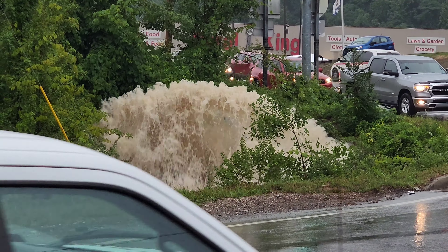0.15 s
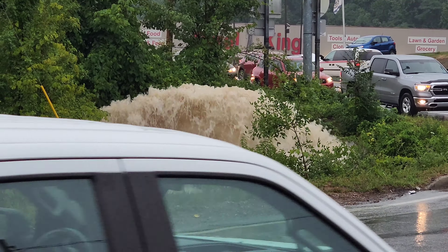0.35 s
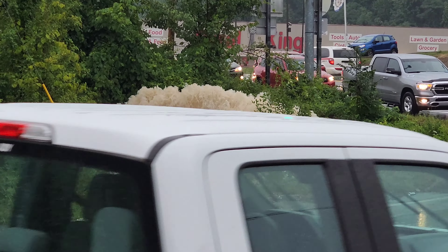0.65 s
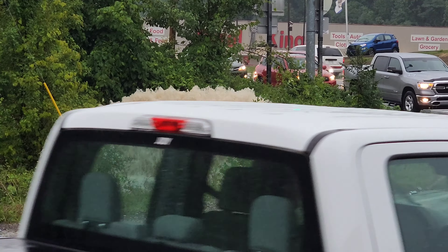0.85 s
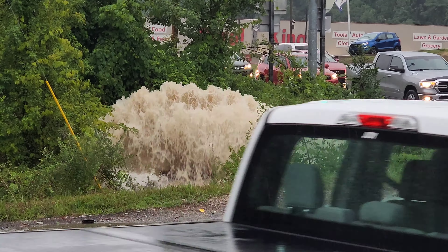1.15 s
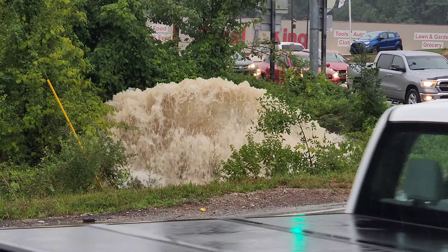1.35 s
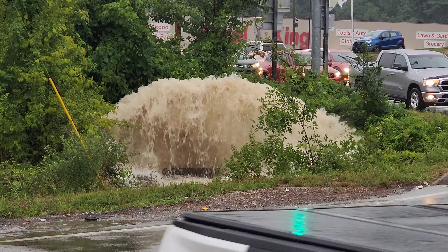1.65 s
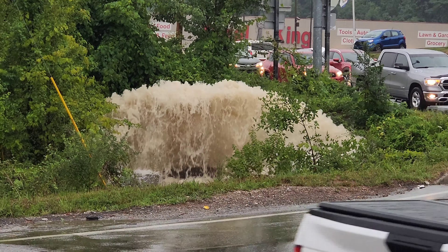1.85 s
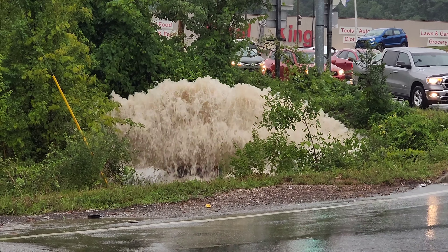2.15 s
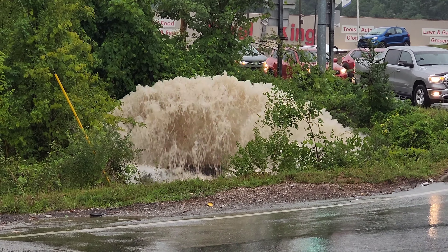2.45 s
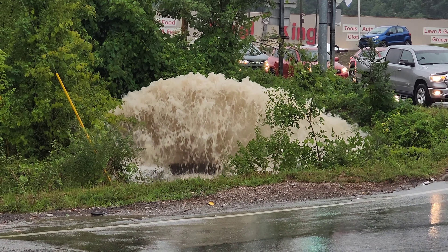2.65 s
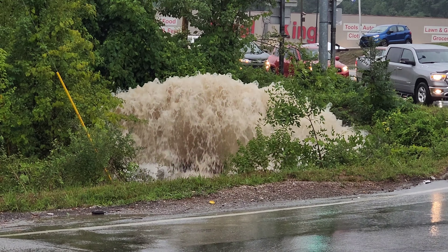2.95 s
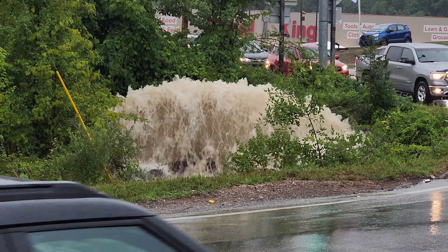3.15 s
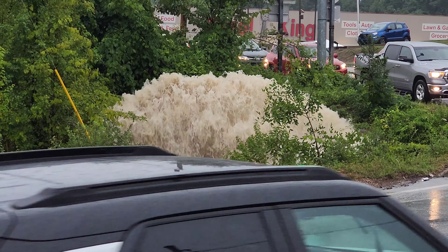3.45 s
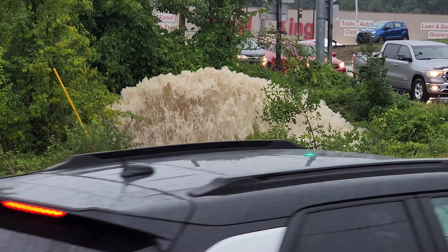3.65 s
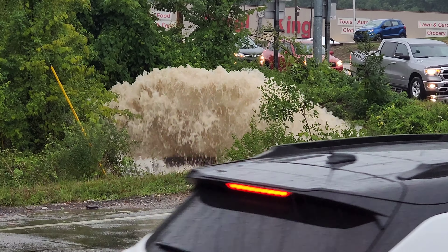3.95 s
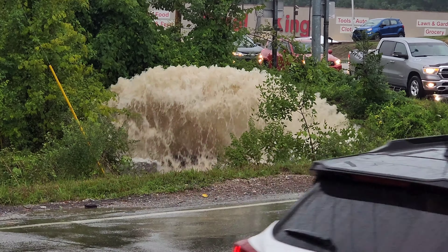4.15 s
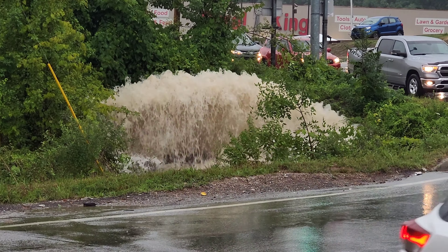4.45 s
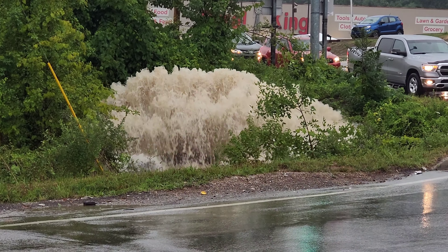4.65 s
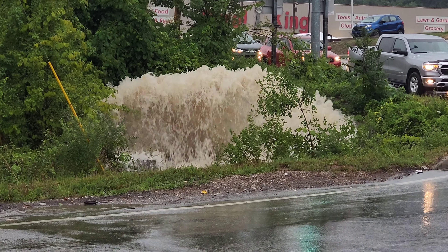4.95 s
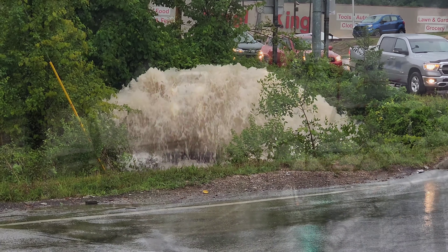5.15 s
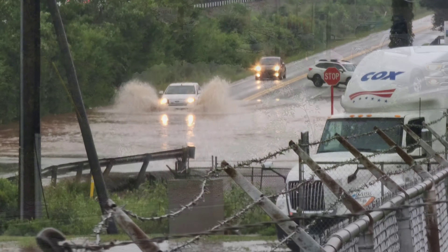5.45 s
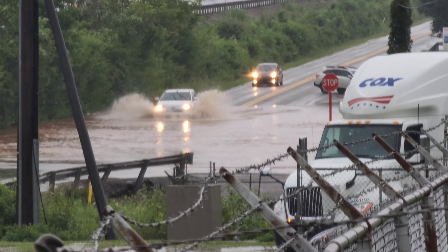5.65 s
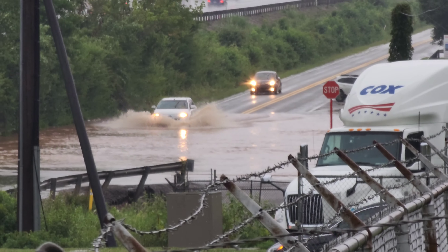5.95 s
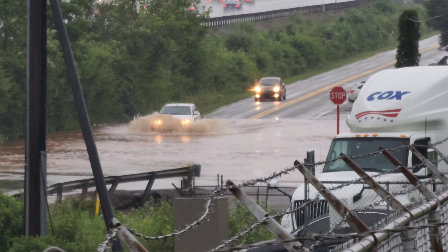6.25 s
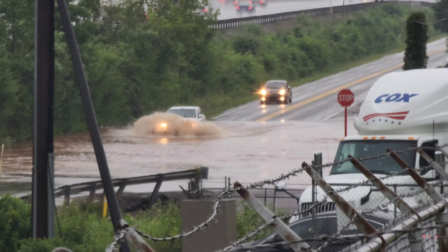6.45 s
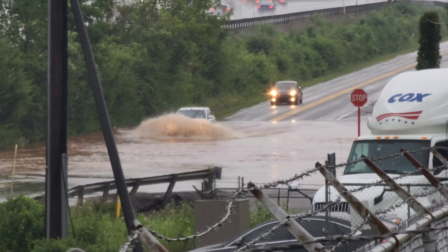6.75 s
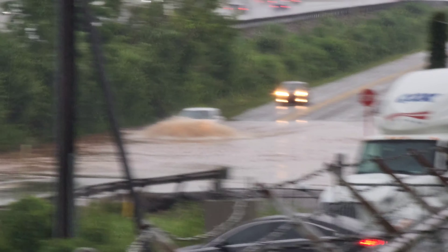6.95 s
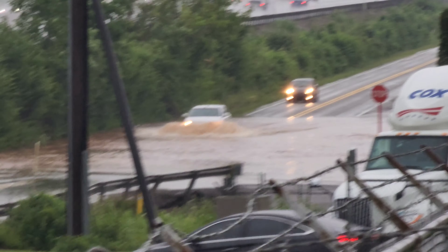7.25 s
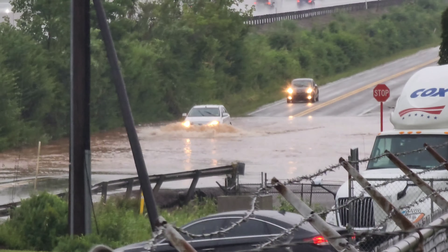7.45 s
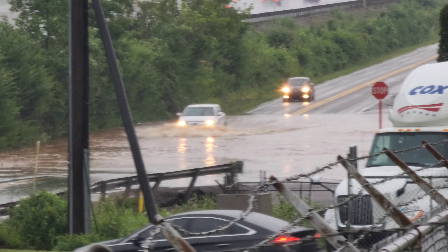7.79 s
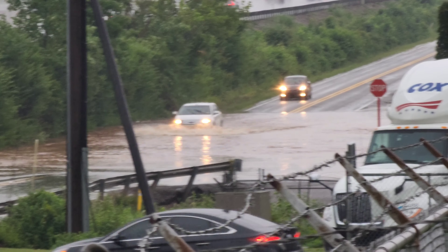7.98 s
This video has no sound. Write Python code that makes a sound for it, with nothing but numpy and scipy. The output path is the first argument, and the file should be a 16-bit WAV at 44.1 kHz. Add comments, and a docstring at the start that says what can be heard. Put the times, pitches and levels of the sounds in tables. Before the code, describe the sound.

From 0 to about 5 seconds, floodwater gushes continuously from a roadside drain: a dense, turbulent rush with bubbles, fine spray and gentle surges. Low traffic rumble lies beneath. A pickup passes close around 0.4 to 1.4 s, with wet tyre hiss, deep engine growl and a quick loose metallic rattle just after 1 s; a soft wheel clunk comes at 1.7. Another car drones and swishes by around 3.4 to 4.6 s, and tiny drops tick nearby. Brief low wind buffets appear. A small clank at 5.0 s falls within the crossfade, 4.8 to 5.8 s, into a flooded road. Here a wading car throws broad splashing spray that slowly weakens, while a lorry engine revs up until 7 s, then eases down. At 7.05 to 7.15 s a rapid clatter of hollow, dull knocks shakes close to the microphone; scattered knocks and deep thumps continue until 7.9 s over the wash.

```python
"""Drain fountain and flooded road

Floodwater gushes from a roadside drain while vehicles pass on the wet road, one of them clanking.
From about five seconds this blends into a flooded road, with a wading car, a lorry and dull knocks.
Water is patchy filtered noise with ringing bubbles; engines and vehicle hums are wavering tones;
metal and panel are struck resonances. Wind and late panel booms are short low swings, and traffic
is low filtered noise."""
import sys
import numpy as np
from scipy import signal
from scipy.fft import rfft, irfft, next_fast_len
from scipy.io import wavfile
from scipy.ndimage import uniform_filter1d, map_coordinates

SR = 44100
rng = np.random.default_rng(int(sys.argv[2]) if len(sys.argv) > 2 else 0)


def transcribe(u):
    """Save the signal u as a 16-bit wav file named by the first command-line argument.

    u: samples, shape (n,) or (channels, n), limited to [-1, 1]; the rate is SR.
    q: integer samples, one column per channel.
    """
    v = np.clip(np.atleast_2d(u).T, -1, 1)
    q = np.round(v * 32767).astype(np.int16)
    wavfile.write(sys.argv[1], SR, q)


N = 358091  # samples

SPRAY_DB, SPLASH_DB = -34.5, -29  # the fountain at rest
SPLASH_FOLLOWS = 0.3  # share of the surges that the heavy water follows
# spectrum of the fountain: pitch_hz, relative density_db (per Hz), left_minus_right_db, likeness (0-1)
DRAIN_SPECTRUM = [(396,-4,-0.5,0), (640,-1.5,-0.5,0.82), (860,-2,-3,0), (1380,0,-2,0.35),
                  (2170,-3.5,5,0.26), (2540,-8,3,0.3), (3030,-8,7.5,0.13), (4740,-24,16.5,0),
                  (5500,-16.5,15,0.03), (7020,-18,2.5,0.38), (7860,-16,-2.5,1), (9250,-25,5,0.5),
                  (10900,-21,-4,0.95), (11650,-15.5,-7,0.97), (13200,-22.5,5.5,0.27), (15500,-26,12,0.22)]
# surges of the fountain: centre_s, half_duration_s, extra_spray_db
DRAIN_SURGES = [(.25, 0.33, 1), (1.6, 0.29, 1.6), (2.84, 0.27, 1.5), (3.33, .18, 1), (4.15, 0.24, 1.4)]


def drain():
    """Turbulent jet: slow surges lift the spray most, and its level varies slightly at random."""
    surge_db = sum(db * swell(s, half) for s, half, db in DRAIN_SURGES)
    heave_db = 0.091 * wobble(14)
    splash_db = SPLASH_DB + SPLASH_FOLLOWS * surge_db + heave_db
    spray_db = SPRAY_DB + surge_db + heave_db + 0.4 * wobble(25)
    source = churn(grain_db=-7.0, patchy_db=2.5, drop_hz=7330)
    return water(source, DRAIN_SPECTRUM, -0.18, 3340, splash_db, spray_db)


BLEND_START_S, BLEND_END_S, BLEND_POWER = 4.84, 5.83, 0.94  # the power bends the fade
WASH_DB, BOW_SPRAY_DB = -28.5, -25  # heavy water; spray before slowing, turning and bursts
SLOWING_DB_PER_S = 0.67  # the wading car throws less spray as it slows
TURN_S, TURN_LENGTH_S, TURN_LOSS_DB = 7.1, 0.027, 1  # the microphone swings away from the spray
# spectrum of the flooded road: pitch_hz, relative density_db (per Hz), left_minus_right_db, likeness (0-1)
ROAD_SPECTRUM = [(530,-2.5,-1,0.67), (673,5.5,3,0.48), (780,4.5,-3,0.57), (1050,-1,-1,0.22),
                 (1300,3.5,0,0.49), (2750,-8,-1.5,0.39), (3850,-4,-13.5,0.11), (5170,-14.5,-4.5,0.37),
                 (5850,-19,8,0.16), (7030,-20,13,0.27), (7270,-17,-2,0.97), (8640,-18,0.5,0.77),
                 (10200,-25.5,-2.7,0.9), (11700,-20.5,-6,0.92), (14500,-27.5,2,0.74)]
# the bow wave breaks higher and lower: centre_s, half_duration_s, extra_spray_db
BOW_BURSTS = [(5.812, 0.11, 1), (6.503, 0.051, -1), (7.046, 0.038, 1.1), (7.142, 0.045, -1.5)]


def flooded_road():
    """Breaking bow wave: broadband spray over heavy wash, both surging, the spray waning with speed."""
    t = clock()
    turned = (1 + np.tanh((t - TURN_S) / TURN_LENGTH_S)) / 2
    slowing_db = SLOWING_DB_PER_S * np.maximum(t - BLEND_END_S, 0)
    burst_db = sum(db * swell(s, half) for s, half, db in BOW_BURSTS)
    spray_db = BOW_SPRAY_DB - slowing_db - TURN_LOSS_DB * turned + burst_db
    surge_db = 0.44 * wobble(18)
    source = churn(grain_db=-8.0, patchy_db=1.5, drop_hz=6940)
    return water(source, ROAD_SPECTRUM, 0.35, 2080, WASH_DB + surge_db, spray_db + surge_db)


def places():
    """Crossfade: gains of the drain and of the flooded road as one gives way to the other."""
    blend = np.interp(clock(), [BLEND_START_S, BLEND_END_S], [0, 1])
    return (1 - blend) ** BLEND_POWER, blend ** BLEND_POWER


def water(source, table, lead_ms, split_hz, splash_db, spray_db):
    """Spectral shaping: heavy splash below split_hz and fine spray above it, each at its own level."""
    pair = ears(source, lambda hz: along(table, hz, axis=3), lead_ms)

    def colour(hz):
        ratio = amp(along(table, hz, axis=2))
        balance = np.array([ratio, np.ones_like(ratio)]) / np.hypot(ratio, 1)
        return amp(along(table, hz)) * above(hz, 230) * balance

    splash = unit(filtered(pair, lambda hz: colour(hz) * below(hz, split_hz)))
    spray = unit(filtered(pair, lambda hz: 1j * colour(hz) * above(hz, split_hz)))
    return amp(splash_db) * splash + amp(spray_db) * spray


def churn(grain_db, patchy_db, drop_hz):
    """Turbulence: two unrelated channels of patchy hiss studded with bubbles and droplets."""
    z = signal.stft(rng.standard_normal((2, N)), nperseg=512)[2]
    field = rng.standard_normal(z.shape[1:])
    field = uniform_filter1d(field, size=13, axis=0)  # smooth across frequency
    field = uniform_filter1d(field, size=12, axis=1)  # smooth across time
    fineness = np.linspace(0.3, 1, len(field))[:, None]  # treble is patchier than bass
    hiss = signal.istft(z * amp(patchy_db * fineness * unit(field)), nperseg=512)[1][:, :N]
    grains = np.array([bubbles(drop_hz, cycles=6.2, spread_db=0.5, count=9000) for ear in hiss])
    return unit(hiss) + amp(grain_db) * grains


def bubbles(pitch_hz, cycles, spread_db, count, size=200):
    """Bubble resonance: many short damped rings rise in pitch; the long low ones start softer."""
    t = np.arange(size) / SR
    start = rng.integers(0, N, (count, 1))
    hz = np.clip(pitch_hz * np.exp(0.55 * rng.standard_normal((count, 1))), 800, 14500)
    strength = hz * amp(spread_db * np.minimum(rng.exponential(size=(count, 1)), 4))
    age = hz * t / cycles  # time in units of the decay
    rise = 1 + np.minimum(age, 2) / 20
    ring = strength * np.exp(-age) * np.sin(2 * np.pi * hz * t * rise)
    sample_index = (start + np.arange(size)).ravel()
    return unit(np.bincount(sample_index, ring.ravel(), N + size)[:N])


FAVOUR_DB, FAVOUR_WIDTH_HZ = 10, 60  # each knock lifts the modes near one pitch
THUD_HZ, THUD_Q = 142, 4  # low boom of a blow; its pitch over its width
SCUFF_DB = -19  # the brighter scuff of each knock, against its ring
SHUDDER_RAGGED_DB = 1  # random flare and falter of the shudder
# knocks of a hollow panel: start_s, ring_level_db, brightness_hz, favoured_pitch_hz, thud_level_db
PANEL_KNOCKS = [(7.045, -14, 595, 400, -7.5), (7.053, -10, 1100, 330, -7.5), (7.059, -9.5, 600, 340, -22),
                (7.067, -16, 750, 540, -28), (7.087, -15, 700, 400, -15), (7.096, -10, 600, 460, -26),
                (7.111, -8.5, 1050, 786, -4), (7.117, -4.5, 550, 364, -16), (7.127, -9, 700, 380, -22),
                (7.135, -7.5, 900, 370, -7), (7.144, -20, 850, 480, -28), (7.258, -14, 1000, 420, -20),
                (7.274, -13, 950, 760, -25), (7.4, -15, 950, 610, -29), (7.546, -12, 900, 340, -20),
                (7.579, -17, 900, 690, -28), (7.591, -12, 600, 480, -24), (7.633, -9, 650, 320, -22),
                (7.648, -8, 650, 520, -22), (7.663, -13, 700, 540, -14), (7.699, -14, 950, 400, -11),
                (7.766, -20, 500, 250, -13), (7.786, -10.5, 900, 280, -12)]
# modes of the panel: pitch_hz, width_hz, level_db
PANEL_MODES = [(147, 28, -7), (277, 31, -6.5), (339.4, 20, 0), (391, 40, 0), (462, 122, -1), (643, 150, -3),
               (813, 170, -4.5)]


def knocks():
    """Modal excitation: blows ring a hollow panel with thud and scuff, and noise makes it shudder."""
    def panel(hz, bright_hz):
        return body(PANEL_MODES, hz) * below(hz, bright_hz, order=3)

    def struck(hz, bright_hz, pitch_hz):
        favour_db = FAVOUR_DB / (1 + ((hz - pitch_hz) / FAVOUR_WIDTH_HZ) ** 2)
        return panel(hz, bright_hz) * amp(favour_db)

    def boom(hz):
        return body([(THUD_HZ, THUD_HZ / THUD_Q, 0)], hz) * below(hz, 340)

    def bright(hz):
        return above(hz, 940) * below(hz, 2000)

    ring_rows = [row[:-1] for row in PANEL_KNOCKS]
    thud_rows = [(s, db) for s, *_, db in PANEL_KNOCKS]
    scuff_rows = [(s, db + SCUFF_DB) for s, db, *_ in PANEL_KNOCKS]
    ring = strikes(ring_rows, t60=0.035, hardness=0.68, response=struck, alike=0.92, lead_ms=0.37)
    thud = strikes(thud_rows, t60=0.025, hardness=0.89, response=boom, alike=0.94, lead_ms=0.25)
    scuff = strikes(scuff_rows, t60=0.13, hardness=0.05, response=bright, alike=0.4, lead_ms=0.31)
    noise = ears(rng.standard_normal((2, N)), lambda hz: 0.7, lead_ms=0.23)
    shudder = unit(filtered(noise, lambda hz: panel(hz, bright_hz=950)))
    ragged = amp(SHUDDER_RAGGED_DB * wobble(70))
    return ring + thud + scuff + shaking() * ragged * shudder


SHUDDER_SWELL_DB_PER_S = 1000
# bouts of shuddering of the panel: start_s, end_s, level_db, fade_db_per_s
SHUDDER_BOUTS = [(7.067, 7.155, -27.5, 110), (7.205, 7.713, -29, 120), (7.502, 7.663, -27.5, 110.5),
                 (7.765, 7.82, -30, 16)]


def shaking():
    """Power summation: the overlapping bouts give the gain of the panel's shudder."""
    bouts = [held(start, end, db, SHUDDER_SWELL_DB_PER_S, fade) for start, end, db, fade in SHUDDER_BOUTS]
    return np.sqrt(sum(bout ** 2 for bout in bouts))


# loose metal on passing cars: start_s, level_db, brightness_hz
METAL_CLANKS = [(1.02, -22, 2000), (1.031, -17, 2100), (1.041, -21, 2100), (1.050, -18.5, 2000),
                (1.062, -23, 1900), (1.122, -21, 1700), (1.25, -27, 1600), (1.34, -26, 1800),
                (5.012, -23, 1800), (5.018, -23, 2300)]
# modes of the metal: pitch_hz, width_hz, level_db
METAL_MODES = [(910, 100, -8.5), (990, 57, -3.5), (1240, 440, -6), (1530, 100, 1), (1730, 230, -2.5),
               (2100, 43, 1.5)]
# wheels over a bump: start_s, level_db
WHEEL_CLUNKS = [(1.715, -23), (5.018, -24)]


def clanks():
    """Modal excitation: blows ring loose metal on passing cars; band-passed blows clunk their wheels."""
    def metal(hz, bright_hz):
        return body(METAL_MODES, hz) * below(hz, bright_hz, order=8)

    def wheel(hz):
        return above(hz, 270) * below(hz, 800)

    rattle = strikes(METAL_CLANKS, t60=0.1, hardness=0.2, response=metal, alike=0.76, lead_ms=-0.14)
    clunk = strikes(WHEEL_CLUNKS, t60=0.059, hardness=0.28, response=wheel, alike=0.7, lead_ms=-0.13)
    return rattle + clunk


# engines pulling: start_s, end_s, firing_rate_hz, glide_hz_per_s, level_db, swell_db_per_s, fade_db_per_s
PICKUP_PULLS = [(.42, .48, 57.5, 10.3, -17, 42, 72), (1.03, 1.37, 52.67, 11, -13, 38, 94)]
CAR_PULLS = [(.02, .3, 72.2, -7.5, -25, 15, 20), (.92, 1.0, 72.5, 29, -17, 32, 70),
             (2.27, 3.78, 70.37, 3.2, -22, 130, 44), (4.92, 5.04, 70.7, 3.5, -22.5, 39, 62)]
# engine orders: multiple of the firing rate, level_db
PICKUP_ORDERS = [(1, 1.5), (2, -18), (3, -24), (5, -25.5)]
CAR_ORDERS = [(1, 1), (2, -15.5), (4, -23)]
# steady and gliding hums of passing vehicles, from tyre treads and, in the last row, a high drone
# of the lorry: centre_s, half_duration_s, pitch_hz, glide_hz_per_s, level_db
VEHICLE_HUMS = [(0.251, 0.63, 211, -22, -31.5), (2.05, 0.2, 199.6, 3, -31), (2.35, 0.38, 270, -55.5, -37.5),
                (3.05, .3, 244.6, -12, -39), (3.4, .4, 163, 17, -36), (3.599, 0.19, 198, 19.5, -34),
                (4.241, 0.11, 181, 4, -27.5), (4.5, 0.081, 185.5, 0, -29.5), (4.35, 0.5, 283, 22, -40.5),
                (6.4, .6, 342, 0, -43)]


def vehicles():
    """Periodic excitation: engine orders of a pickup, cars and a lorry, with steady and gliding hums."""
    pickup = engine(PICKUP_PULLS, PICKUP_ORDERS, rough_db=-1.0)
    cars = engine(CAR_PULLS, CAR_ORDERS, rough_db=0.8)
    hums = 0
    for s, half, hz, glide, db in VEHICLE_HUMS:
        pitch_hz = hz + glide * (clock() - s)
        hums = hums + amp(db) * swell(s, half) * hum(pitch_hz, [(1, 0)], rough_db=2.0, waver=0.01085)
    return pickup + cars + hums + lorry()


def engine(pulls, orders, rough_db):
    """Harmonic synthesis: each pull swells, holds and fades while its pitch glides."""
    total = 0
    for start, end, hz, glide, db, swell_db, fade_db in pulls:
        pitch_hz = hz + glide * (clock() - start)
        tone = hum(pitch_hz, orders, rough_db, waver=0.0034)
        total = total + held(start, end, db, swell_db, fade_db) * tone
    return total


LORRY_DB, LORRY_DB_PER_HZ = -28.5, 0.28  # level at lowest revs, unloaded, as the blend ends; rise with revs
LORRY_LOAD_DB = 0.09  # louder while it gathers speed, per Hz/s
LORRY_NEARS_DB_PER_S = 3.5
# the lorry revs up and eases off: time_s, firing_rate_hz
LORRY_REVS = [(5.2, 80), (5.8, 88.46), (6.2, 88.95), (6.8, 97.6), (7.05, 97.85), (7.4, 85.95), (7.7, 85.65),
              (8.12, 79.6)]
# lorry orders: multiple of the firing rate, level_db
LORRY_ORDERS = [(1, 1), (0.26, -15), (1.5, -17)]


def lorry():
    """Load-dependent radiation: louder as the lorry nears, revs higher and pulls harder."""
    time_s, rate_hz = np.transpose(LORRY_REVS)
    hz = np.interp(clock(), time_s, rate_hz)
    load = uniform_filter1d(np.gradient(hz) * SR, size=SR // 10)
    revs_db = LORRY_DB_PER_HZ * (hz - hz.min())
    nearing_db = LORRY_NEARS_DB_PER_S * (clock() - BLEND_END_S)
    db = LORRY_DB + revs_db + LORRY_LOAD_DB * load + nearing_db
    return places()[1] * amp(db) * hum(hz, LORRY_ORDERS, rough_db=2.0, waver=0.012)


def hum(hz, orders, rough_db, waver):
    """Harmonic synthesis: orders of one phase, unsteady in level and in pitch (waver, as a share)."""
    phase = 2 * np.pi * np.cumsum(hz * (1 + waver * wobble(20))) / SR
    return sum(amp(level + rough_db * wobble(17)) * np.sin(k * phase) for k, level in orders)


# cars on the wet road: centre_s, half_duration_s, swish_db, swish_centre_hz, rumble_db, drone_db
CAR_PASSES = [(0.453, 0.42, -30.5, 1430, -24, -32), (1.347, 0.6, -32, 1370, -31, -31.5),
              (2.052, 0.76, -48, 1380, -25.5, -32.5), (3.803, 0.48, -32.5, 1165, -35, -42),
              (4.598, 0.81, -34.5, 1826, -32.5, -35.5)]


def swishes():
    """Band-passed noise: wet tyres hiss up and fade as each car goes by."""
    def swish(centre_hz):
        pair = ears(rng.standard_normal((2, N)), lambda hz: 0.45, lead_ms=-0.11)
        return unit(filtered(pair, lambda hz: above(hz, centre_hz) * below(hz, centre_hz * 0.93)))

    return sum(amp(db) * swell(s, half) * swish(hz) for s, half, db, hz, _, _ in CAR_PASSES)


# thin whistle as the pickup passes: centre_s, half_duration_s, pitch_hz, swing_to_each_side_hz, level_db
PASSING_WHISTLE = (.95, .36, 14200, 1000, -50)


def whistle():
    """Frequency modulation: a faint high tone, blurred by fast wobble, glides up and levels off."""
    s, half, hz, swing_hz, db = PASSING_WHISTLE
    pitch_hz = hz + swing_hz * np.tanh((clock() - s) / half) + 260 * wobble(900)
    return amp(db) * swell(s, half) * np.sin(2 * np.pi * np.cumsum(pitch_hz) / SR)


# near drops: start_s, level_db
NEAR_DROPS = [(2.9078, -24.5), (3.3272, -21), (4.0384, -29)]


def drops():
    """Impulsive excitation: single drops tick close by as short high band-passed blows."""
    def tick(hz):
        return above(hz, 8200) * below(hz, 14000)

    return strikes(NEAR_DROPS, t60=0.0059, hardness=0.27, response=tick, alike=0.59, lead_ms=0)


# short low swings, from wind buffets and from the booms of the late panel knocks:
# centre_s, peak_db, half_duration_s, mean pitch_hz
LOW_SWINGS = [(0.45, -17, 0.072, 102), (0.947, -16, 0.035, 104.3), (1.85, -21.5, 0.058, 86.6),
              (2.292, -12.5, 0.037, 78), (5.788, -17, 0.04, 82.6), (5.999, -13.5, 0.014, 79.6),
              (6.31, -19, 0.1, 88), (7.13, -14, .07, 48.3), (7.557, -12.5, 0.023, 86.2),
              (7.71, -6, 0.017, 91.7), (7.79, -7.5, 0.028, 74.8), (7.852, -16, 0.025, 72),
              (7.931, -17.5, 0.042, 52.2)]


def low_swings():
    """Low-frequency pressure pulses: wind buffets and late panel booms as short wavering tones."""
    swing = 2 * np.pi * np.cumsum(1 + 0.1337 * wobble(50)) / SR
    return sum(amp(db) * swell(s, half) * np.sin(hz * swing) for s, db, half, hz in LOW_SWINGS)


DRAIN_RUMBLE_DB, DRAIN_DRONE_DB = -27.5, -32.5  # distant traffic at the drain
ROAD_RUMBLE_DB, ROAD_DRONE_DB = -26.5, -33  # distant traffic at the flooded road
SHAKE_RUMBLE_DB, SHAKE_DRONE_DB = 1, -2  # low end of the shaking, against the shudder
# spectra of road rumble and tyre drone: pitch_hz, relative density_db (per Hz)
RUMBLE_SPECTRUM = [(20, -34), (32, -10), (50, 2), (75, 0), (105, -1.5), (140, -13), (220, -25), (500, -55)]
DRONE_SPECTRUM = [(20, -40), (70, -6), (130, 2), (190, 1), (260, -5), (360, -7), (520, -11), (1200, -48.5)]


def traffic():
    """Incoherent addition: distant traffic, passing cars and the shaking panel sum in power."""
    at_drain, at_road = places()
    sources = [(np.sqrt(at_drain), DRAIN_RUMBLE_DB, DRAIN_DRONE_DB),
               (at_road, ROAD_RUMBLE_DB, ROAD_DRONE_DB),
               (shaking(), SHAKE_RUMBLE_DB, SHAKE_DRONE_DB)]
    for s, half, _, _, rumble_db, drone_db in CAR_PASSES:
        sources.append((swell(s, half), rumble_db, drone_db))
    rumble = np.sqrt(sum((gain * amp(db)) ** 2 for gain, db, _ in sources))
    drone = np.sqrt(sum((gain * amp(db)) ** 2 for gain, _, db in sources))
    return rumble * roar(RUMBLE_SPECTRUM, alike=0.96) + drone * roar(DRONE_SPECTRUM, alike=0.97)


def roar(spectrum, alike):
    """Coloured noise: low stereo noise of rms 1, nearly alike in both ears."""
    pair = ears(rng.standard_normal((2, N)), lambda hz: alike, 0)
    return unit(filtered(pair, lambda hz: amp(along(spectrum, hz))))


def strikes(rows, t60, hardness, response, alike, lead_ms):
    """Source-filter model: a clean impulse (energy share hardness) and a decaying burst excite a body."""
    track = np.zeros((2, N))
    t = np.arange(SR // 4) / SR
    lead_in = SR // 50  # silence that leaves room for the ear delays
    decay = amp(-60 * t / t60)  # t60 in seconds
    share = np.clip(hardness, 0, 1)
    for s, db, *own in rows:  # own: further columns, which shape the response
        burst = np.sqrt(1 - share) * decay * rng.standard_normal((2, len(t)))
        burst[0, 0] = np.sqrt(share) * np.linalg.norm(decay)
        pair = ears(np.pad(burst, ((0, 0), (lead_in, 0))), lambda hz: alike, lead_ms)
        gain = np.sqrt(np.mean(abs(response(np.linspace(0, SR / 2, 4096), *own)) ** 2))
        add(track, s - lead_in / SR, amp(db) / gain * filtered(pair, lambda hz: response(hz, *own)))
    return track


def body(modes, hz):
    """Modal superposition: causal response of a set of resonances with alternating signs."""
    total = 0
    for k, (centre, width, db) in enumerate(modes):
        resonance = 1j * hz * width / (centre * centre - hz * hz + 1j * hz * width)
        total = total + (-1) ** k * amp(db) * resonance
    return total


def ears(pair, alike, lead_ms):
    """Interaural coherence: unrelated signals become left and right; the left leads below the treble."""
    def mid_side(hz):
        turn = np.arccos(np.clip(alike(hz), 0, 1)) / 2 * np.ones_like(hz)
        return np.array([np.cos(turn), np.sin(turn)])

    def lead(hz):  # a negative lead_ms lets the right ear lead
        return np.exp(1j * np.pi * hz * lead_ms / 1000 * (hz < 6500) * np.array([[1], [-1]]))

    mid, side = filtered(pair, mid_side)
    return filtered(np.array([mid + side, mid - side]), lead)


def filtered(x, response):
    """Linear filtering: x times a complex response of frequency."""
    n = x.shape[-1]
    m = next_fast_len(n + SR // 4, True)
    return irfft(rfft(x, m) * response(np.fft.rfftfreq(m, 1 / SR)), m)[..., :n]


def below(hz, edge_hz, order=4):
    """Butterworth magnitude: low-pass gain."""
    return 1 / np.sqrt(1 + (hz / edge_hz) ** (2 * order))


def above(hz, edge_hz, order=4):
    """Power complement: high-pass gain that completes below."""
    return np.sqrt(1 - below(hz, edge_hz, order) ** 2)


def along(points, hz, axis=1):
    """Log-frequency interpolation: one column of a table over frequency."""
    table = np.asarray(points, float)
    return np.interp(np.log(hz + 1), np.log(table[:, 0]), table[:, axis])


def swell(s, half):
    """Gaussian envelope: gain 1 at time s, falling to 1/e at half seconds on either side."""
    return np.exp(-((clock() - s) / half) ** 2)


def held(start, end, db, swell_db, fade_db):
    """Exponential envelope: swells, holds from start to end and fades; slopes in dB a second."""
    t = clock()
    swelling_db = abs(swell_db) * np.maximum(start - t, 0)
    fading_db = abs(fade_db) * np.maximum(t - end, 0)
    return amp(db - swelling_db - fading_db)


def wobble(rate):
    """Band-limited randomness: a smooth random curve with rate knots a second."""
    knots = rng.standard_normal(int(N * rate / SR) + 4)
    return map_coordinates(knots, [np.arange(N) * rate / SR])


def clock():
    """Sampling: the time of every sample in seconds."""
    return np.arange(N) / SR


def amp(db):
    """Decibel law: amplitude gain of a level in dB."""
    return 10 ** (np.asarray(db) / 20)


def unit(x):
    """Power normalisation: x at rms 1."""
    return x / np.sqrt(np.mean(x ** 2) + 1e-20)


def add(track, s, sound):
    """Superposition: mix a sound into a track from time s."""
    part = track[..., round(s * SR):][..., :sound.shape[-1]]
    part += sound[..., :part.shape[-1]]


def scene():
    """Superposition: the waters of the two places crossfade and all other sources add."""
    at_drain, at_road = places()
    waters = at_drain * drain() + at_road * flooded_road()
    road = traffic() + swishes() + vehicles() + whistle()
    return waters + road + clanks() + knocks() + low_swings() + drops()


TOP_HZ = 15780  # band limit


def record(dry):
    """Band limitation: an ideal low-pass keeps nothing from TOP_HZ up."""
    return filtered(dry, lambda hz: hz < TOP_HZ)


dry = scene()
out = record(dry)
transcribe(out)
```